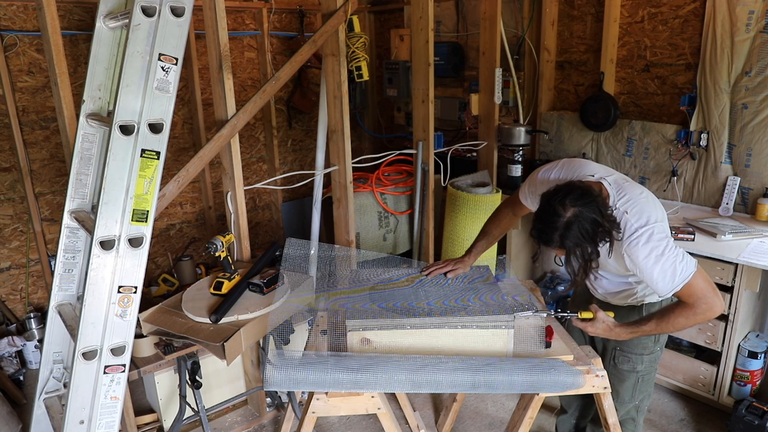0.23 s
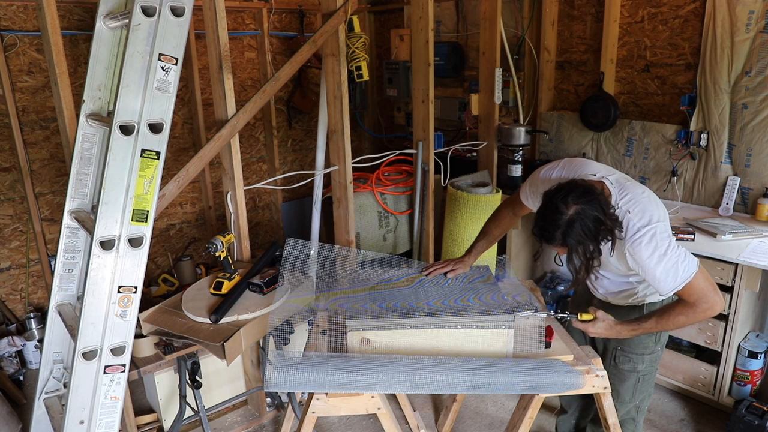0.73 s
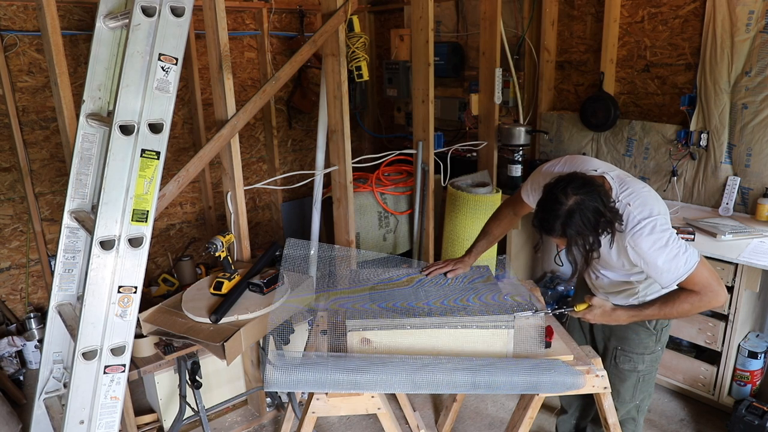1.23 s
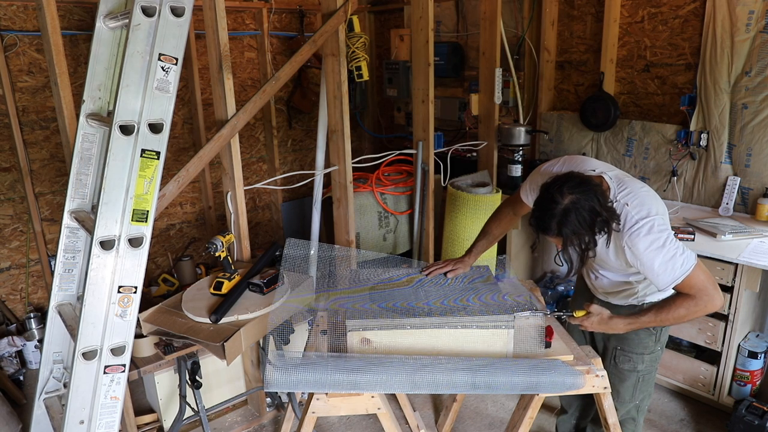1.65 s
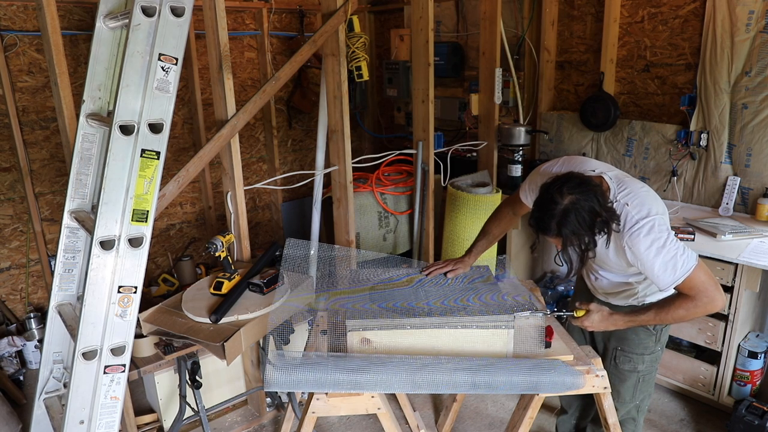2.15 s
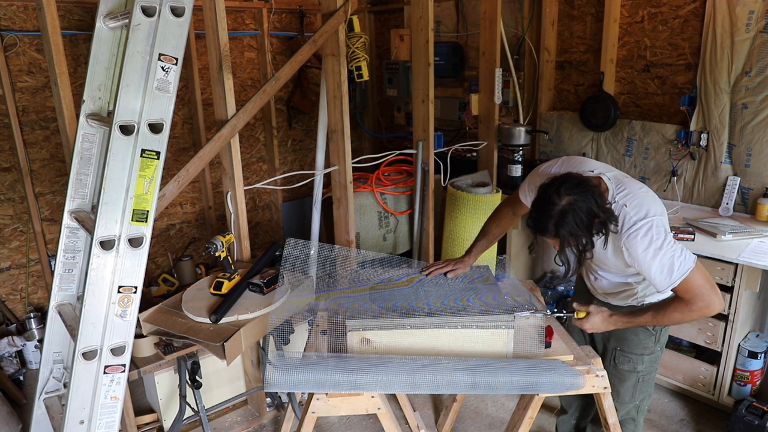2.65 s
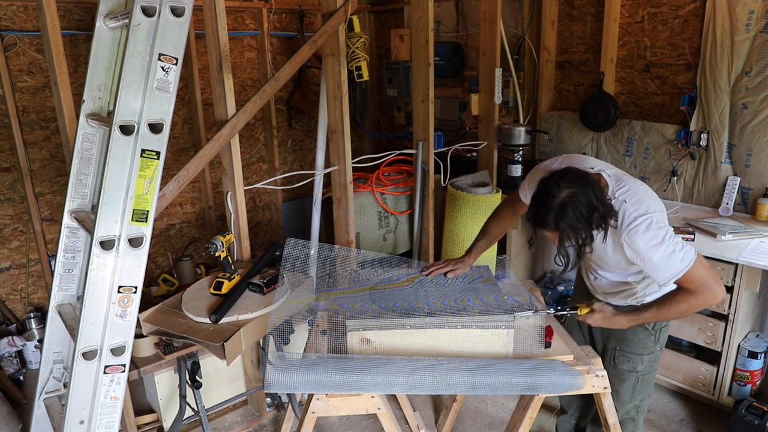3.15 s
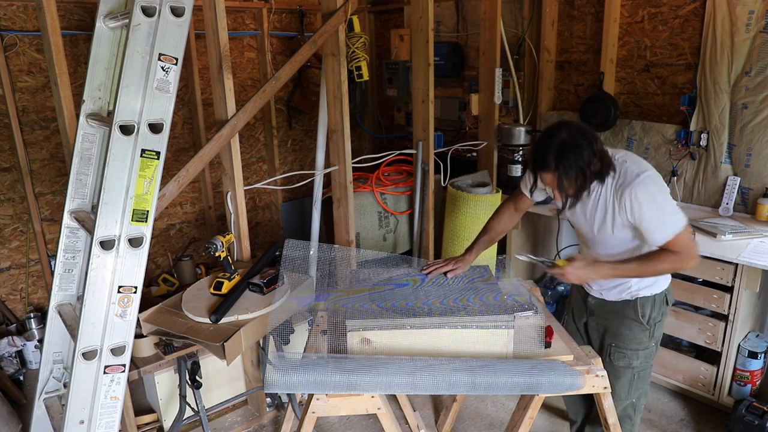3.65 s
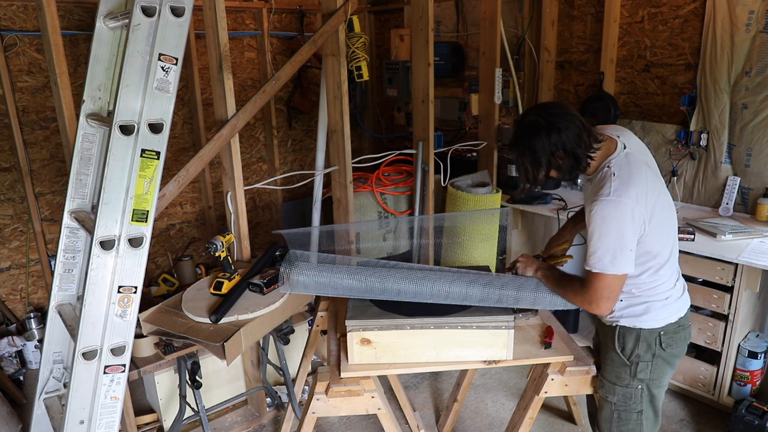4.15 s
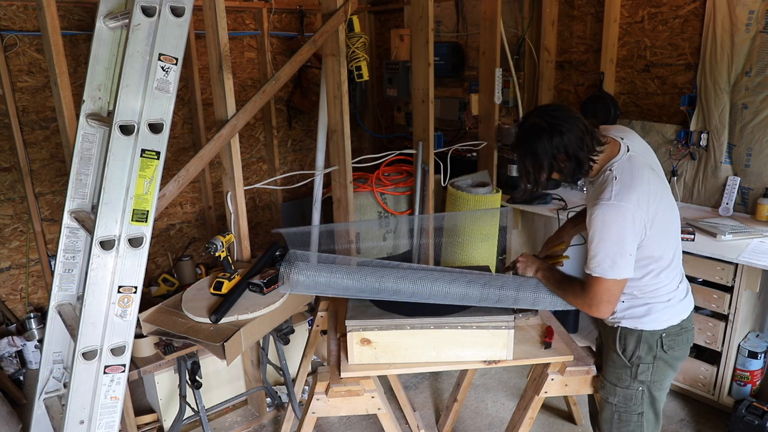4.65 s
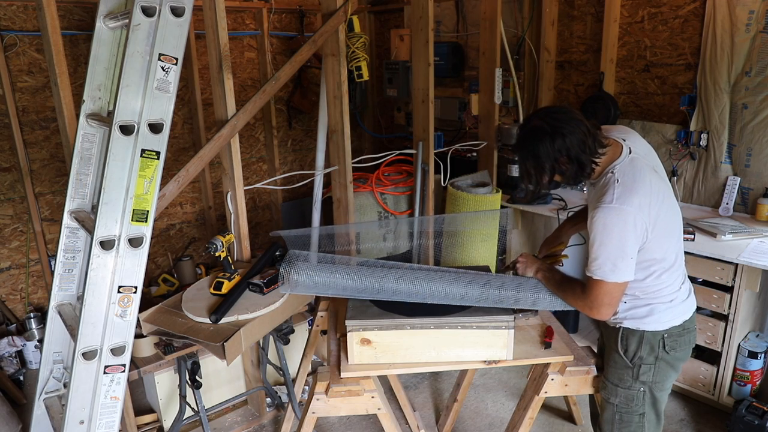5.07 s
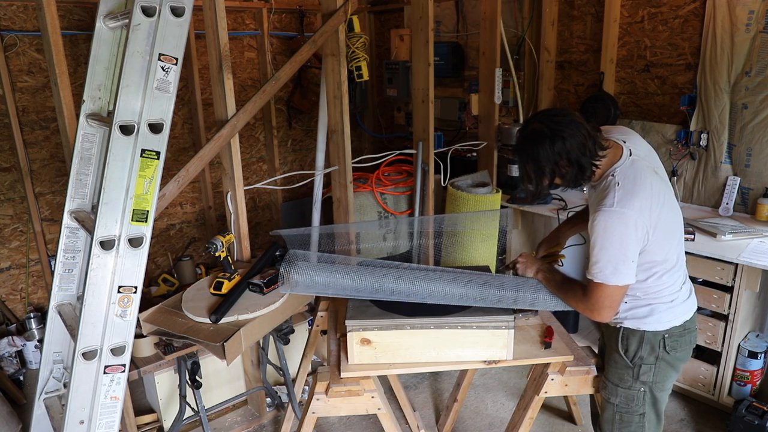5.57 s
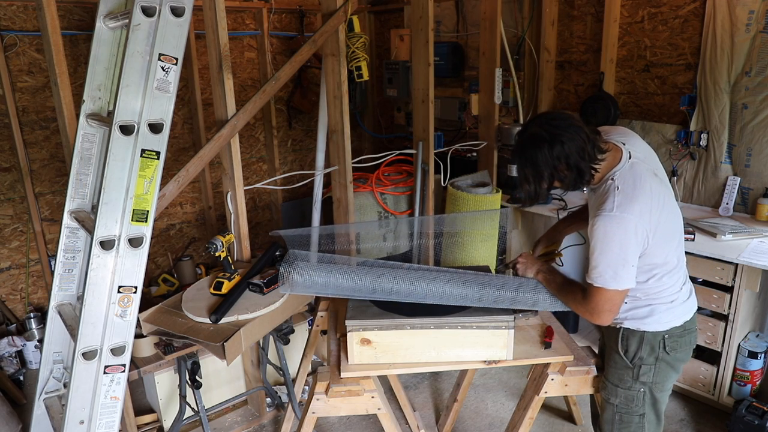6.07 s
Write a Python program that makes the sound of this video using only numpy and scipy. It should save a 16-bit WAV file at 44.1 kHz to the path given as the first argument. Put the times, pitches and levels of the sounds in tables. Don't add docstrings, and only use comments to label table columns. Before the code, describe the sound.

A hand staple gun snaps sharply on a hollow wooden box in a timber shed, with knocks, mesh rustle, then more snaps and a cricket.

```python
import sys
import numpy as np
from scipy import signal
from scipy.fft import rfft, irfft
from scipy.io import wavfile
from scipy.ndimage import uniform_filter1d

SR = 44100
rng = np.random.default_rng(int(sys.argv[2]) if len(sys.argv) > 2 else 0)


def decibels_to_gain(level_db):
    exponent = np.asarray(level_db, float) / 20
    return 10 ** exponent


def to_wav(sig):
    pcm = np.clip(np.atleast_2d(sig), -1, 1) * 32767
    pcm = np.round(pcm).astype(np.int16)
    wavfile.write(sys.argv[1], SR, pcm.T)


N = 278271
CHANGE_S = 3.82

# start in seconds, level in dB of the low, middle and high steel mode, shed echo in dB.
SNAPS = [(0.196, -4.5, -8.5, -11.5, -24), (0.4444, -2.5, -2, -5, -21.5), (0.5604, -3.5, 0, -3.5, -21.5),
         (0.965, -11, -9.5, -26.5, -31), (2.6657, -3.5, -5, -7.5, -22.5), (2.709, -3.5, -5, -3, -20),
         (3.9294, -10, -15, -14, -23), (3.9704, -10, -15.5, -8.5, -23.5), (4.0559, -6, -11.5, -8.5, -22),
         (4.5348, -6.5, -18, -2.5, -21), (4.5855, -4.5, -12.5, -1, -20), (5.0095, -8, -18, -8, -22.5),
         (5.4967, -11.5, -11, -10.5, -21), (5.5456, -6.5, -15, -5, -22), (5.991, -10, -11.5, -10, -21.5),
         (6.0559, -5, -10, -3, -20.5)]
# centre in Hz, width in Hz, level in dB.
BOX = [(243, 72, 1.5), (489, 26.6, 9), (907, 57, 0.5), (1122, 33, -5), (1435, 80, -9.5), (1620, 15, -21.5)]
# centre in Hz, width in Hz, level in dB.
FRAME = [(274, 72, 11.5), (339, 34.6, 11), (499, 26, 10), (580, 66, -4.5), (706, 21, -41), (823.5, 23.4, 2),
         (1340, 18, -38), (177, 346, -1)]
# start in seconds, level in dB, length in seconds.
THUDS = [
    (4.256, -36, 0.032),
    (4.72, -33, 0.06),
    (5.215, -32.5, 0.064),
    (5.73, -34.5, 0.038),
    (6.2, -33, 0.044),
]
# start in seconds, level in dB, length in seconds,
# grit in dB over the wood, boom in dB over the wood.
THUMPS = [
    (0.941, -32.5, 0.027, 9, 11.5),
    (.96, -44.5, 0.015, 12, 16),
    (1.075, -41.5, 0.053, -20, 20.5),
    (1.514, -40.5, 0.042, -3.5, 6.5),
    (2.256, -36, 0.017, -5.5, 18),
    (3.063, -44, 0.034, -1, 13.5),
    (3.103, -33, 0.014, 7, 20),
    (3.298, -46.5, 0.06, -4.5, 12.5),
]


def level(x, db):
    return x * decibels_to_gain(db) / np.sqrt(np.mean(x ** 2))


def peak(x, db):
    return x * decibels_to_gain(db) / np.max(np.abs(x))


def ring(x, hz, width_hz):
    return signal.lfilter(*signal.iirpeak(hz, hz / width_hz, fs=SR), x)


def body(x, modes):
    return sum((-1) ** k * decibels_to_gain(db) * ring(x, hz, width) for k, (hz, width, db) in enumerate(modes))


def noise():
    return rng.standard_normal(N)


def walk(rate):
    k = int(SR / rate)
    steps = np.repeat(rng.standard_normal(N // k + 1), k)
    return 1.3 * uniform_filter1d(uniform_filter1d(steps, k), k)[:N]


def add(track, s, sound):
    if s < CHANGE_S:
        left_s = CHANGE_S - s - np.arange(len(sound)) / SR
        sound = sound * np.clip(left_s / .004, 0, 1)
    i = int(s * SR)
    part = sound[max(-i, 0):N - i]
    track[max(i, 0):max(i, 0) + len(part)] += part


def snap(crack_db, *mode_db):
    # centre in Hz, width in Hz.
    main_modes = [(1400, 278), (2820, 146), (4550, 314)]
    # centre in Hz, width in Hz, level in dB over the high mode.
    high_side = [(3600, 170, -13), (5760, 320, -9)]
    # centre in Hz, width in Hz, level in dB over the crack.
    crack_side = [(8000, 800, -5), (10400, 1900, -2)]
    t = np.arange(1024) / SR
    chatter = rng.standard_normal(len(t)) * t * np.exp(-t / .0007)
    blow = t * np.exp(-t / .00008) + .02 * chatter
    steel = peak(np.diff(chatter, prepend=0), crack_db)
    for (hz, width), db in zip(main_modes, mode_db):
        steel = steel + peak(ring(ring(blow, hz, width), hz, 7 * width), db)
    for hz, width, db in high_side:
        steel = steel + peak(ring(ring(blow, hz, width), hz, 3 * width), mode_db[-1] + db)
    for hz, width, db in crack_side:
        steel = steel + peak(ring(chatter, hz, width), crack_db + db)
    return signal.lfilter(*signal.butter(4, 980, "high", fs=SR), steel)


def snaps(track, spots):
    # mode levels in dB (low, middle, high), shed echo in dB.
    earlier = (-17, -33, -1.5, -27.5)
    # mode levels in dB (low, middle, high), shed echo in dB.
    bounce = (-12, -13.5, -7.5, -26.5)
    # centre in Hz, width in Hz, level in dB.
    box_boom = (150, 100, 4.4)
    # centre in Hz, width in Hz, level in dB.
    mesh = [(3000, 14000, -1.5), (5270, 990, 0)]
    crack_under_db = (-5, -8.5)
    box_thump_db, bench_thump_db, jaws_db = 12.5, 7.5, -3.5
    click = signal.unit_impulse(4096)
    box = decibels_to_gain(box_thump_db) * body(click, BOX) + body(click, [box_boom])
    bench = decibels_to_gain(bench_thump_db) * (body(click, FRAME) + 0.07 * ring(click, 1100, 400))
    for k, (s, *blow_db, shed_db) in enumerate([(-.04, *earlier), (.5695, *bounce), *SNAPS]):
        on_roll = int(s > CHANGE_S)
        steel = snap(np.mean(blow_db) + crack_under_db[on_roll], *blow_db)
        wire = body(click, [mesh[on_roll]])
        jaws = decibels_to_gain(jaws_db) * np.pad(steel, (0, 3072)) / np.linalg.norm(steel)
        wood = bench if on_roll else box
        parts = [click + wire, jaws, wood]
        echo = sum(signal.fftconvolve(part, spots[(k + j) % 5]) for j, part in enumerate(parts))
        add(track, s, steel)
        add(track, s, 8 * decibels_to_gain(shed_db) * echo)


def scrape(length_s, rise, uneven_db=3.5):
    t = np.arange(8192) / SR
    contacts = rng.standard_normal(len(t)) * decibels_to_gain(uneven_db * rng.exponential(size=len(t)))
    shape = np.minimum(t / (rise * length_s), 1) * np.exp(-(t / length_s) ** 2)
    return contacts * shape / np.sqrt(np.mean(contacts ** 2))


def knocks(track, spots):
    # start in seconds, level in dB, length in seconds,
    # grit in dB over the wood, grit centre in Hz.
    taps = [(.840, -44.5, 0.006, 5, 2740), (.902, -44.5, 0.0074, 15, 2400), (1.25, -43.5, 0.014, 4, 1910),
            (2.15, -52, 0.017, 0.5, 5900), (2.971, -51, 0.0055, 0, 3000), (3.106, -61.5, 0.011, 25, 9100),
            (3.13, -41.5, 0.028, 4, 480), (3.342, -59, 0.021, 9, 8000), (3.634, -43.5, 0.0032, 9, 2500),
            (3.799, -59, 0.0023, 25, 1404), (3.932, -27, 0.026, 3.5, 750)]
    tap_boom_db, thump_grit_hz = 1, 1970
    blows = [(*row, tap_boom_db) for row in taps]
    blows += [(*row, thump_grit_hz, boom_db) for *row, boom_db in THUMPS]
    for k, (s, db, length_s, grit_db, grit_hz, boom_db) in enumerate(sorted(blows)):
        rub, grit = scrape(length_s, .1), scrape(.6 * length_s, .1)
        boom = ring(ring(rub, 367, 250), 290, 270) + 0.42 * ring(rub, 232, 52)
        wood = 3.44 * body(rub, BOX[1:]) + 0.75 * ring(rub, 830, 930) + decibels_to_gain(boom_db) * boom
        crunch = ring(grit, grit_hz, 1.1 * grit_hz) + .012 * grit
        knock = decibels_to_gain(db) * (wood + decibels_to_gain(grit_db) * crunch)
        add(track, s, 2.4 * knock)
        add(track, s, 1.33 * signal.fftconvolve(knock, spots[k % 5]))


def tinks(track):
    # start in seconds, peak level in dB, centre in Hz, width in Hz.
    touches = [
        (0.841, -31, 2880, 700),
        (3.343, -39.5, 8360, 90),
        (3.345, -41, 7700, 200),
        (3.638, -33.5, 4220, 61),
        (3.64, -37, 2240, 90),
        (3.799, -29.5, 1380, 450),
        (3.115, -16, 490, 50),
    ]
    for s, db, hz, width_hz in touches:
        add(track, s, peak(ring(scrape(4 / width_hz, .05), hz, width_hz), db))


def rustle():
    # time in seconds, level in dB.
    drag = [
        (3.2, -52),
        (3.248, -39.5),
        (3.364, -48),
        (3.652, -41.5),
        (3.78, -47),
        (3.82, -45),
    ]
    uneven_db = 3.5 * np.minimum(rng.exponential(size=N), 5) + 2.2 * walk(90)
    ticks = noise() * decibels_to_gain(uneven_db)
    ticks = ring(ticks, 740, 1050) + 0.31 * ring(ticks, 3100, 4000)
    ticks = signal.lfilter(*signal.butter(3, 6500, fs=SR), ticks)
    t = np.arange(N) / SR
    moving = np.clip((t - drag[0][0]) / .08, 0, 1) * (t < CHANGE_S)
    times, db = np.transpose(drag)
    return level(ticks, 0) * decibels_to_gain(np.interp(t, times, db)) * moving


def thuds(track, spots):
    for k, (s, db, length_s) in enumerate(THUDS):
        thud = decibels_to_gain(db) * 4 * body(scrape(length_s, 0.34, uneven_db=0.5), FRAME)
        thud = signal.lfilter(*signal.butter(4, 1150, fs=SR), thud)
        add(track, s, 1.7 * thud)
        add(track, s, 0.72 * signal.fftconvolve(thud, spots[k % 5]))


def shed():
    # centre in Hz, time in seconds.
    decay = [(120, 0.89), (300, 0.55), (700, 0.41), (1400, 0.39), (2800, 0.37), (5600, 0.4), (11000, 0.19),
             (16000, 0.2)]
    # centre in Hz, level in dB.
    tint = [(120, 15.5), (300, 9.5), (700, 11), (1400, 11.5), (2800, 11), (5600, 8), (11000, -6.5),
            (16000, -21)]
    build_s, hold_s = 0.0014, 0.025
    t = np.arange(SR) / SR
    fall_s = np.hypot(t, hold_s) - hold_s
    spectrum, octave = rfft(rng.standard_normal(SR)), np.log2(np.arange(SR // 2 + 1) + 1)
    out = 0
    for (hz, t60), (_, db) in zip(decay, tint):
        share = np.exp(-((octave - np.log2(hz)) / .7) ** 2)
        out = out + decibels_to_gain(db) * irfft(spectrum * share) * decibels_to_gain(-60 * fall_s / t60)
    return out * (1 - np.exp(-(t / build_s) ** 2)) / 30


def work():
    track, spots = rustle(), [shed()[:SR * 3 // 4] for _ in range(5)]
    snaps(track, spots)
    knocks(track, spots)
    thuds(track, spots)
    tinks(track)
    return track


def crickets():
    # start in seconds, end in seconds, level in dB.
    songs = [
        (-.2, 2.35, -64),
        (3.82, 5.49, -64),
    ]
    near_hz, stroke_rate_hz, fade_s, rest_db = 7380, 70.7, .015, -81
    chorus_hz, chorus_db = 5690, -61.5
    t = np.arange(N) / SR
    phase = t * stroke_rate_hz % 1
    strokes = np.exp(-((phase - .2) / .11) ** 2) + .7 * np.exp(-((phase - .62) / .11) ** 2)
    wing = ring(noise(), near_hz, 45) + 0.34 * ring(noise(), 6300, 200)
    song = sum(decibels_to_gain(db) * np.clip(np.minimum(t - a, b - t) / fade_s, 0, 1) for a, b, db in songs)
    near = level(ring(wing * strokes, near_hz, 323), 0) * (song + decibels_to_gain(rest_db))
    far = 0
    for hz in (.97 * chorus_hz, 1.04 * chorus_hz):
        far = far + ring(ring(noise(), hz, 350), hz, 660) * decibels_to_gain(1.74 * walk(5.9))
    return near + level(far, chorus_db)


def air():
    # time of the top in seconds, level in dB, half length in seconds.
    gusts = [(0.043, -37, .08), (0.29, -33, .07), (0.533, -45, 0.041), (.78, -33, 0.155), (1.287, -38, .09),
             (1.75, -52, 0.19), (2.06, -50, .1), (2.843, -35, 0.07), (3.04, -36, 0.058), (3.366, -41, 0.18),
             (4.11, -26, 0.077), (4.313, -36.5, 0.12), (4.676, -40, 0.13), (4.87, -43, .08),
             (5.11, -33.5, 0.087), (5.394, -34, 0.058), (5.62, -39.5, 0.11), (5.876, -44.5, 0.062),
             (6.146, -32.5, 0.074)]
    # frequency in Hz, level in dB per Hz.
    hiss_colour = [(150, -50.5), (250, -17), (493, -17), (618, -16), (875, -10.5), (3460, -18),
                   (5630, -19.5), (6590, -25.5), (7190, -13), (7840, -24), (16000, -25.5)]
    calm_db, rumble_db, hiss_db = -49.5, -50, -55
    puff_rumble_db = -17
    shake_s, shake_db, snap_shake_db = 0.057, -8.5, -27.5
    t = np.arange(N) / SR
    puffs = sum(decibels_to_gain(db) * np.exp(-((t - s) / half_s) ** 2) for s, db, half_s in gusts)
    blows = [(s, db + shake_db) for s, db, *_ in THUDS + THUMPS]
    blows += [(s, db + snap_shake_db) for s, *_, db in SNAPS]
    shake = 0
    for s, db in blows:
        late = np.maximum(t - s, 0) / shake_s
        shake = shake + decibels_to_gain(db) * late * np.exp(1 - late)
    stir = np.sin(2 * np.pi * np.cumsum(32 + 5 * walk(14)) / SR)
    deep = level(stir * (1 + .55 * walk(22)), 0)
    low = ring(ring(noise(), 63, 23), 60, 27) + 1.09 * ring(noise(), 96.3, 28)
    low = low + 0.55 * ring(noise(), 220, 140) + .5 * ring(noise(), 487, 40)
    low = level(low, 2.03)
    hz, db = np.transpose(hiss_colour)
    colour = decibels_to_gain(np.interp(np.log(np.arange(N // 2 + 1) * SR / N + 1), np.log(hz), db))
    hiss = level(irfft(rfft(noise()) * colour, N), hiss_db)
    rumble = decibels_to_gain(rumble_db) + decibels_to_gain(puff_rumble_db) * puffs + shake
    return (decibels_to_gain(calm_db) + puffs) * deep + rumble * decibels_to_gain(0.43 * walk(5)) * low + hiss * decibels_to_gain(0.27 * walk(1.73))


def scene():
    return (work() + crickets() + air())[None]


def band_limit(x):
    return signal.sosfilt(signal.butter(12, 16840, fs=SR, output="sos"), x)


def record(dry):
    top = signal.sosfilt(signal.ellip(10, .2, 70, 15700, fs=SR, output="sos"), dry)
    mix = np.clip(1.74 * np.tanh(top / 1.837), -1, 1)
    return band_limit(mix)


dry = scene()
out = record(dry)
to_wav(out)
```